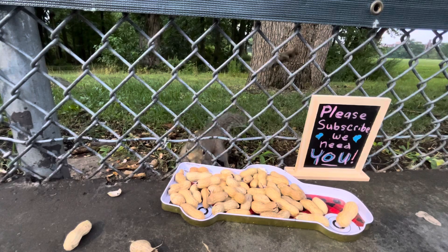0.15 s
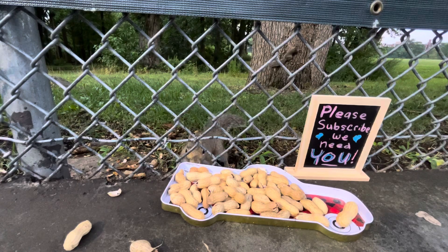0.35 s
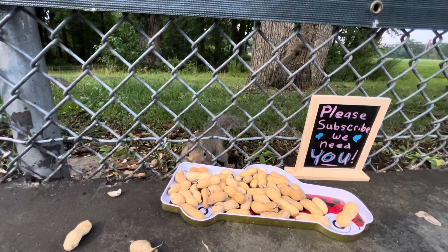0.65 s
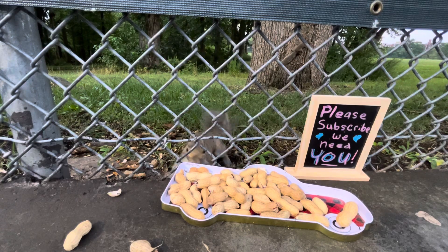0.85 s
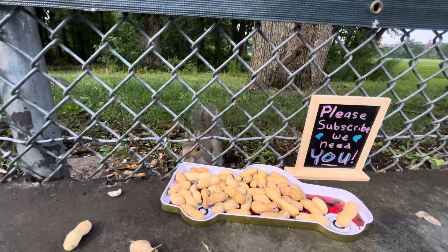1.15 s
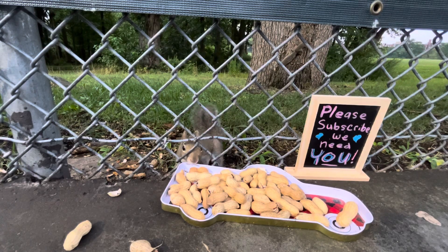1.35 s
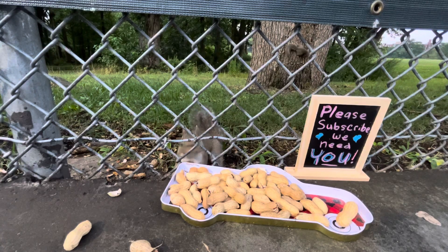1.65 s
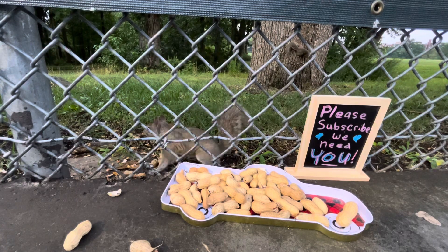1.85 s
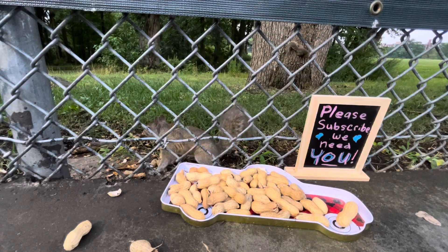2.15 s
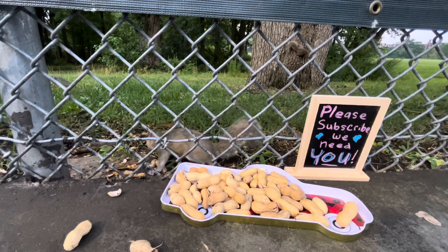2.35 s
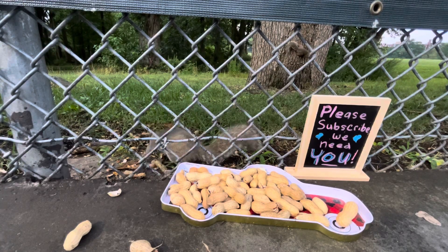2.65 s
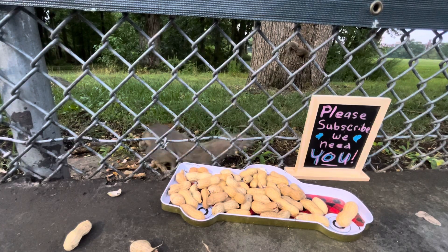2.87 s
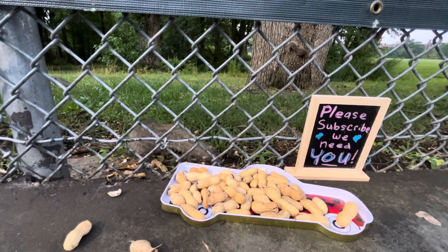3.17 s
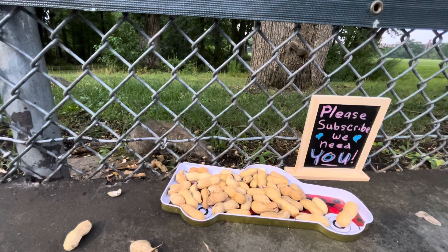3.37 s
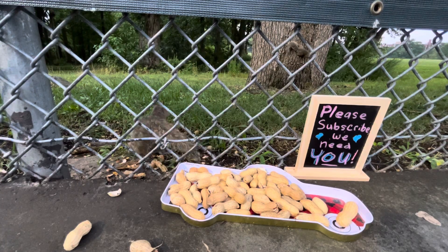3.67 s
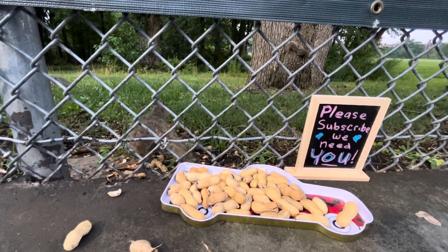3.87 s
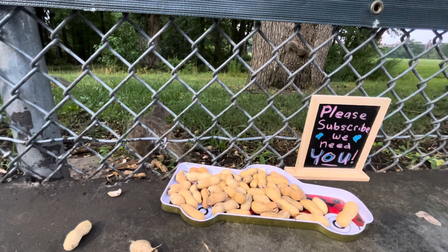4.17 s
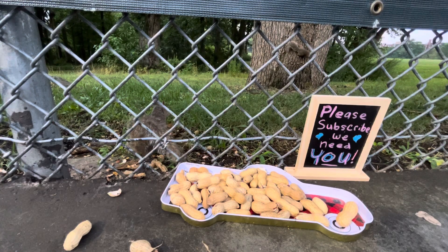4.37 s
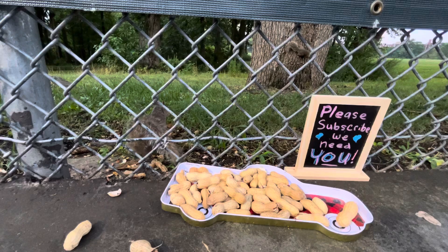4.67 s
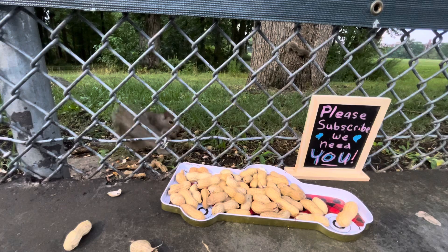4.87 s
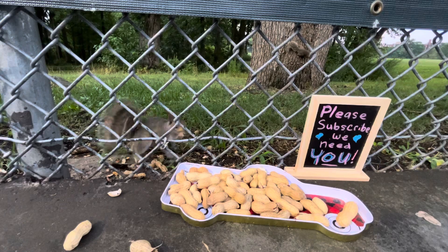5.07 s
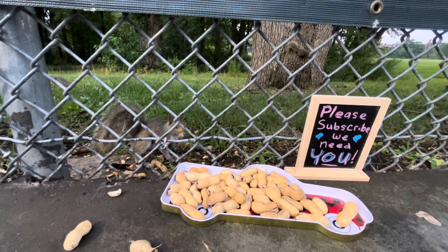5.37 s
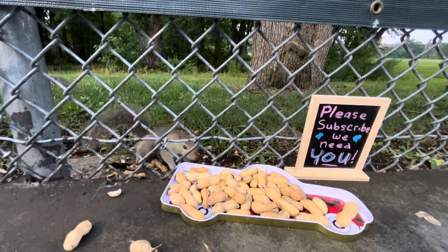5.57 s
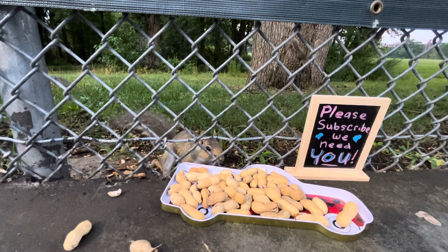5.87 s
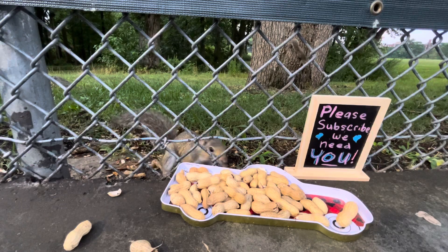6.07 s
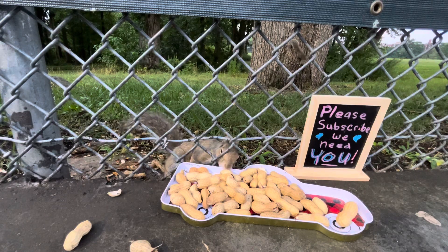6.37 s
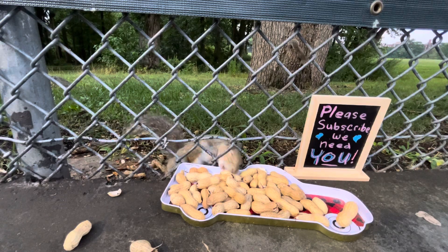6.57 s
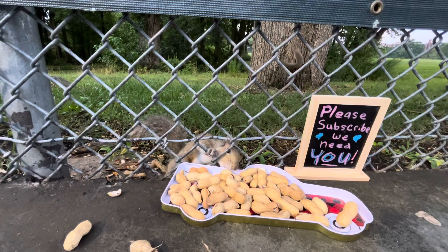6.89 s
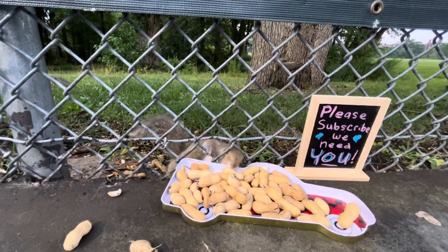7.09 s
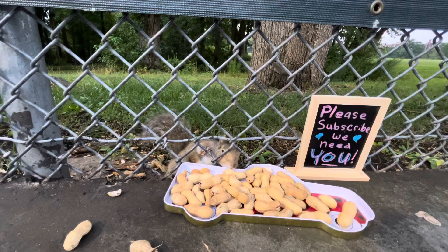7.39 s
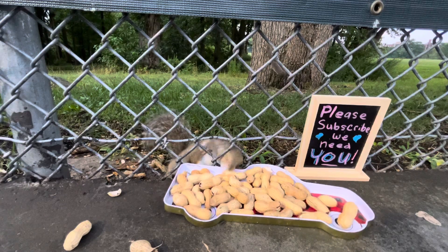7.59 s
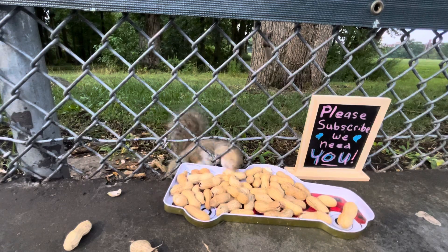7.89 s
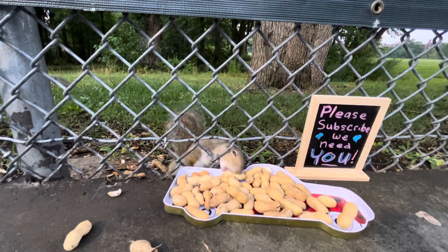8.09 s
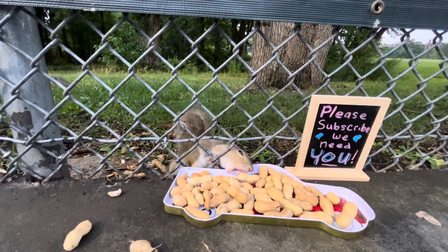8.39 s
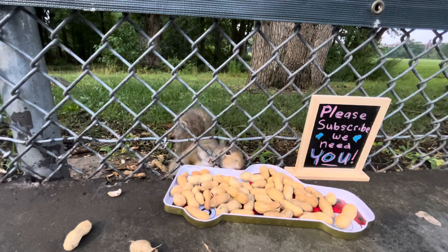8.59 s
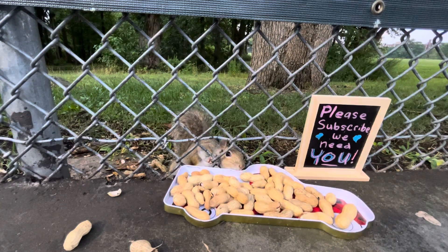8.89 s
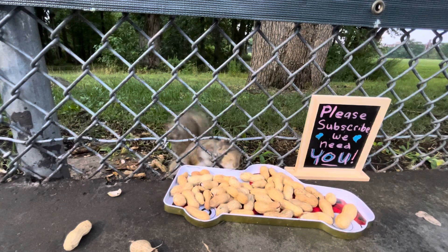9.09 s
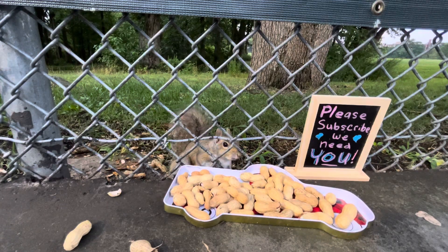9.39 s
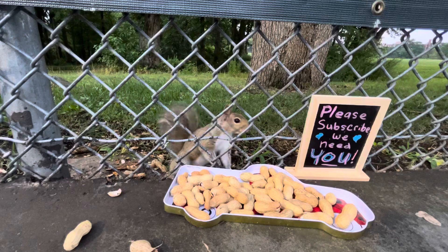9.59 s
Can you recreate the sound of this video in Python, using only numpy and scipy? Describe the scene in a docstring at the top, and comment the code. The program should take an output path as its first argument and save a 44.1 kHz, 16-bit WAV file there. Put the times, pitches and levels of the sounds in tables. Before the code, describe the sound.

Hollow racket, wall and ground pocks echo outdoors over a low hum; midway, peanuts clatter sharply in a tin tray beside faint claw ticks.

```python
"""A squirrel rummages in a tin tray of peanuts: grainy noise crackles as shells, fading tones ring as the tin.
Its claws and teeth tick on dry shells (tiny snaps of noise), and its paws rustle the husks.
Farther off a ball goes round a practice court: racket, wall, ground, each a click and a hollow ringing pock.
Crickets, distant traffic and town rumble are coloured noise; an engine hums as one wavering low tone."""
import sys
import numpy as np
from scipy import signal
from scipy.fft import rfft, irfft, next_fast_len
from scipy.io import wavfile
from scipy.ndimage import map_coordinates

SR = 44100
rng = np.random.default_rng(int(sys.argv[2]) if len(sys.argv) > 2 else 0)


def store_pcm(level_fs):
    """Save levels as 16-bit WAV."""
    pcm = np.round(np.clip(level_fs, -1, 1) * 32767).astype(np.int16)
    wavfile.write(sys.argv[1], SR, np.atleast_2d(pcm).T)


N = 429534


def amp(db):
    """Turns decibels into a plain multiplier."""
    return 10 ** (np.asarray(db) / 20)


def unit(x):
    """Scales x to an rms of 1."""
    return x / np.sqrt(np.mean(x ** 2) + 1e-20)


def fade(t, t60):
    """A natural decay: falls 60 dB in t60 seconds."""
    return np.exp(-np.log(1000) * t / t60)


def along(points, hz):
    """Reads a curve of (Hz, value) points on a log frequency axis."""
    f, v = np.transpose(points)
    return np.interp(np.log(hz + 1), np.log(f + 1), v)


def curves(rows):
    """One value per sample for each column after the time."""
    s, *cols = np.transpose(rows)
    return [np.interp(np.arange(N) / SR, s, c) for c in cols]


def wobble(rate):
    """A smooth curve through random points, `rate` of them a second."""
    points = rng.standard_normal(int(N * rate / SR) + 4)
    return map_coordinates(points, [np.arange(N) * rate / SR])


def filtered(x, response):
    """Multiplies the spectrum of x by a function of frequency."""
    n = x.shape[-1]
    m = next_fast_len(n + 4096)
    return irfft(rfft(x, m) * response(np.fft.rfftfreq(m, 1 / SR)), m)[..., :n]


def coloured(x, spectrum, size=1024):
    """Shapes the tone of x with a filter of unit energy that never sounds ahead of x."""
    # folding the cepstrum forward in time gives the filter its sharp start
    cep = irfft(np.log(amp(along(spectrum, np.fft.rfftfreq(size, 1 / SR)))))
    cep[1:size // 2] *= 2
    cep[size // 2 + 1:] = 0
    h = irfft(np.exp(rfft(cep)))
    return signal.fftconvolve(x, h[None] / np.linalg.norm(h), axes=1)[:, :x.shape[1]]


def add(out, s, x):
    """Mixes x into out from time s on."""
    i = max(round(s * SR), 0)
    out[:, i:i + x.shape[-1]] += x[..., :max(N - i, 0)]


def crackle(n, spread_db, shared=0.56, size=40):
    """Stereo noise broken into grains of `size` samples and very different strength; rms 1."""
    grains = np.repeat(amp(spread_db * rng.standard_normal(n // size + 1)), size)[:n]
    own = rng.standard_normal((2, n))
    common = rng.standard_normal(n)
    return unit(grains * (own + shared * common))


def ringing(t, hz, db, t60):
    """Fading tones, their strengths scaled together and met differently by each ear."""
    hz, db, t60 = hz[:, None, None], db[:, None, None], t60[:, None, None]
    strength = amp(db + 2 * rng.standard_normal((len(hz), 2, 1))) / np.linalg.norm(amp(db))
    cycles = hz * t + rng.random((len(hz), 2, 1))
    return np.sum(strength * np.sin(2 * np.pi * cycles) * fade(t, t60), axis=0)


# how alike left and right are at each pitch: pitch_hz, likeness (1 = the same, 0 = unrelated)
LIKENESS = [(60, 0.93), (130, 0.96), (290, 0.51), (640, 0.07), (1410, 0.33), (3100, -0.084), (6820, -0.052),
            (15000, -0.28)]


def rush(spectrum):
    """Stereo noise of rms 1, more alike at the two ears in the bass."""
    def mid_and_side(hz):
        turn = np.arccos(np.clip(along(LIKENESS, hz), -1, 1)) / 2
        return amp(along(spectrum, hz)) * [np.cos(turn), np.sin(turn)]

    mid, side = filtered(rng.standard_normal((2, N)), mid_and_side)
    return unit(np.array([mid + side, mid - side]))


# how fast the court's echo tail dies at each pitch: pitch_hz, t60_s
COURT_DECAY = [(200, 0.2), (550, 0.91), (850, 0.97), (1300, 0.37), (2500, 0.73), (6000, 0.36),
               (14000, 0.41)]


def court(x):
    """A diffuse outdoor tail builds up, then dies at a different speed for each pitch."""
    hz, t, z = signal.stft(rng.standard_normal((2, SR // 2)), SR, nperseg=256)
    build_up = 1 - np.exp(-t / 0.016)
    decay = fade(t, along(COURT_DECAY, hz)[:, None])
    tail = signal.istft(z * decay * build_up, SR, nperseg=256)[1]
    tail = tail + 0.1 * tail[::-1]  # each side leaks a little into the other
    return signal.fftconvolve(x, tail / np.linalg.norm(tail[0]), axes=1)


# tone colours of the town rumble, far tyres, crickets and hiss: pitch_hz, level_db (per Hz)
RUMBLE_COLOUR = [(20, -37), (35, -9.5), (48, -0.5), (80, 1), (120, 0), (180, -6.5), (280, -13.5),
                 (450, -22.5), (900, -54.5), (2000, -72)]
TRAFFIC_COLOUR = [(150, 4.5), (350, -1), (600, 1.5), (1000, 5.5), (1500, -4.5), (2200, -13), (4000, -21.5),
                  (6500, -37), (8000, -39), (15000, -71.5)]
CRICKET_COLOUR = [(3000, -32.5), (4500, -16.5), (5100, -4), (5500, 1.5), (5900, -8), (6400, -11),
                  (7000, -34), (9000, -72)]
HISS_COLOUR = [(2000, 14.5), (6500, 3.5), (8000, -8), (10500, -0.5), (12000, -16.5), (14500, -15),
               (16000, -39)]
# distant traffic draws away: time_s, level_db (before a 2 dB lift and a slow waver)
TRAFFIC_LEVEL = [(0.0, -47.5), (0.65, -47.5), (1.03, -45.5), (3.1, -45.5), (3.9, -48.5), (5.6, -53),
                 (8.3, -54), (9.0, -58), (9.74, -56.5)]
# strength of the engine's hum: time_s, level_db (peak, before it wavers)
HUM_LEVEL = [(0.0, -43), (1.2, -37), (2.75, -44), (3.1, -38), (4.6, -41), (5.4, -38), (6.15, -46),
             (6.35, -37), (7.6, -41), (8.55, -42), (9.05, -33.5), (9.74, -38)]
HUM_HZ = 65.26  # centre of its wavering pitch
RUMBLE_DB, CRICKET_DB, HISS_DB = -39.5, -60.5, -64  # rms, before they waver


def background():
    """Rumble, tyres, cricket chorus and hiss are coloured noise; the engine is a low sine tone."""
    traffic_db, = curves(TRAFFIC_LEVEL)
    hum_db, = curves(HUM_LEVEL)
    # the hum wavers in pitch and strength
    hum_hz = HUM_HZ + 3 * wobble(14)
    hum = amp(hum_db + 2.74 * wobble(14)) * np.sin(2 * np.pi * np.cumsum(hum_hz) / SR)
    rumble = amp(RUMBLE_DB + 1.07 * wobble(7)) * rush(RUMBLE_COLOUR)
    traffic = amp(traffic_db + 2.0 + 0.37 * wobble(3.94)) * rush(TRAFFIC_COLOUR)
    crickets = amp(CRICKET_DB + 0.82 * wobble(25)) * rush(CRICKET_COLOUR)
    crickets *= amp([[.5], [-.5]])  # slightly louder on the left
    hiss = amp(HISS_DB + 3.6 * wobble(7.5)) * rush(HISS_COLOUR)
    return hum + rumble + traffic + crickets + hiss


RATTLE_PER_S, RATTLE_T60 = 1200, 0.0097  # shell contacts a second; ring of each (s)
RATTLE_LOW_HZ, RATTLE_HIGH_HZ = 790, 7020  # pitch range of the shells


def rattle(count=14000):
    """Hollow shells catch on each other at random, each with its own pitch and strength; rms 1."""
    t = np.arange(SR // 140) / SR
    wait, pitch, phase, size = rng.random((count, 4)).T
    contact_s = np.cumsum(-np.log(1 - wait)) / RATTLE_PER_S
    at = (contact_s * SR).astype(int)[:, None] + np.arange(len(t))
    # the square root favours the higher pitches
    hz = RATTLE_LOW_HZ * (RATTLE_HIGH_HZ / RATTLE_LOW_HZ) ** np.sqrt(pitch[:, None])
    rings = amp(-16 * size[:, None]) * fade(t, RATTLE_T60)
    # the right ear meets each ring at a random phase
    ears = [rings * np.sin(2 * np.pi * (hz * t + side * phase[:, None])) for side in (0, 1)]
    return unit(np.array([np.bincount(at.ravel(), ear.ravel(), N)[:N] for ear in ears]))


# tone colours of shells, brittle husks and the woody pile: pitch_hz, level_db (per Hz)
SHELL_COLOUR = [(88, -44.5), (150, 0.5), (391, 1), (612, -6.5), (905, 1), (1170, -8.5), (1630, 4),
                (3490, -7.5), (4320, -4.5), (5360, -9), (6770, -7.5), (8230, -24), (13200, -19),
                (16000, -43)]
HUSK_COLOUR = [(3000, -17.5), (6000, -2.5), (9000, -6.5), (12000, -1.5), (14200, -5.5), (15000, -0.5),
               (16000, -26)]
PILE_COLOUR = [(90, -27), (200, -1.5), (450, -7.5), (800, 1), (1400, -5.5), (2300, -6.5), (3200, -4),
               (6000, -43)]
# shells dragged until they slip: start_s, end_s, final_db, swell_db (final is before the grit's own level)
SCRAPES = [(7.069, 7.076, -41, 2), (7.325, 7.343, -32, 6), (8.03, 8.1, -57, 0), (8.255, 8.334, -36, 12)]
# bouts of pawing in dry husks: start_s, length_s, level_db (before a 7 dB lift and a waver)
PAWING = [(0.0, 0.071, -83), (1.766, .12, -83), (2.918, 0.1, -86), (4.72, .3, -81), (5.5, 0.28, -94),
          (6.497, 0.22, -77.5), (6.974, .38, -73), (7.68, .15, -72.5), (8.02, .2, -74), (8.24, 0.086, -63)]
PAW_ATTACK_S, PAW_RELEASE_T60 = 0.043, 0.39  # rise and fall of a bout (s)
PAW_IDLE_DB = -89.5  # the stir between bouts, before the same lift
SETTLE_DB, SETTLE_T60 = -31, 0.22  # shells settle after each knock: level relative to it, decay (s)


def rummage():
    """Shells scrape and settle as the squirrel noses through the pile; husks rustle under its paws."""
    t = np.arange(SR) / SR
    rubbing, pawing = np.zeros((1, N)), np.full((1, N), amp(PAW_IDLE_DB))
    for s, db, *_ in KNOCKS:
        add(rubbing, s, amp(db + SETTLE_DB) * fade(t, SETTLE_T60))
    for start, end, db, swell_db in SCRAPES:
        length = max(round((end - start) * SR), 1)
        add(rubbing, start, amp(db + np.linspace(-swell_db, 0, length)))
    for start, length, db in PAWING:
        attack = np.minimum(t / PAW_ATTACK_S, 1)
        release = fade(np.maximum(t - length, 0), PAW_RELEASE_T60)
        add(pawing, start, amp(db) * attack * release)
    grit = amp(-4.0) * coloured(crackle(N, spread_db=1.5, size=32), SHELL_COLOUR)
    grit += amp(-6) * coloured(crackle(N, spread_db=4.5), PILE_COLOUR)
    grit += amp(-3.5) * rattle()
    shells = rubbing * amp(1.4 * wobble(70)) * grit
    rustle = coloured(crackle(N, spread_db=4.5), HUSK_COLOUR)
    husks = pawing * amp(7.0 + 2.5 * wobble(25)) * rustle
    return shells + husks


# claws and teeth on dry shells: time_s, strength_db (sets both parts of the tick)
TICKS = [(0.1347, -46.5), (0.4393, -45), (1.807, -56), (4.011, -40.5), (4.6882, -41.5), (4.7316, -44),
         (4.7703, -34), (5.5368, -53), (6.773, -47), (7.142, -38), (7.1844, -47), (7.672, -47)]
TICK_BODY_DB, TICK_BODY_GROWS = -48, .15  # dull part of a 0 dB tick; its dB per dB of strength
FAINT_TICKS_PER_S, FAINT_TICK_DB, FAINT_SPREAD_DB = 1.2, -57, 5  # small ticks: rate, strength, spread


def ticks(count=40):
    """Tiny dry snaps, each with a short crumble; the harder, the brighter. Faint ones fall at random."""
    out, t = np.zeros((2, N)), np.arange(SR // 10) / SR
    faint_s = np.cumsum(rng.exponential(1 / FAINT_TICKS_PER_S, count))
    faint_db = FAINT_TICK_DB + FAINT_SPREAD_DB * rng.standard_normal(count)
    snap = fade(t, 0.0098) + 0.15 * fade(t, 0.12)
    for s, db in TICKS + list(zip(faint_s, faint_db)):
        bright = coloured(crackle(len(t), spread_db=2) * snap, HUSK_COLOUR)
        body = coloured(crackle(len(t), spread_db=2) * snap, SHELL_COLOUR)
        tick = amp(db - 0.5) * bright + amp(TICK_BODY_DB + TICK_BODY_GROWS * db) * body
        add(out, s + 0.0012, tick)
    return out


# tone colour of the dull part of a contact, then of its click: pitch_hz, level_db (per Hz)
KNOCK_COLOUR = [(300, -11), (600, -10), (1050, 13.5), (1600, -29.5), (2500, -5.5), (5000, -20.5)]
CLICK_COLOUR = [(800, -31.5), (1500, 8.5), (3200, -1), (5500, 4), (7500, -3), (10000, -12), (15000, -58)]
RING_T60 = .052  # main ring of one pock (s)


def ball(rows, modes, slap_db, pock_db, click_db, knock_db, right_db, lag_ms, echo_s, flutter_db, wet_db,
         count=8):
    """Each contact is a click and a hollow pock that sinks to its pitch; the court answers."""
    out, t = np.zeros((2, N)), np.arange(SR // 3) / SR
    ears = np.maximum(t - np.array([[lag_ms / 1000], [0]]), 0)  # the left ear hears it later
    for s, snap_db, db, hz, echo_db in rows:
        cycles = hz * (ears + 0.00066 * (1 - np.exp(-ears / 0.00087)))
        # a near reflection swells the ring a few cycles later
        late = np.maximum(ears - .0052, 0)
        swell = amp(slap_db) * fade(late, .02) * (1 - np.exp(-late / .0015))
        linger = amp(-25.5) * fade(ears, 0.24)  # the air in the ball sings on faintly
        pock = np.sin(2 * np.pi * cycles) * (fade(ears, RING_T60) + swell + linger)
        for ratio, mode_db, t60 in modes:
            mode_hz = ratio * hz * (1 + 0.019 * rng.standard_normal())
            strength = amp(mode_db + 2 * rng.standard_normal())
            tone = np.sin(2 * np.pi * (mode_hz * ears + rng.random()))
            onset = 1 - np.exp(-2 * mode_hz * ears)
            pock += strength * tone * fade(ears, t60) * onset
        knock = coloured(rng.standard_normal((1, len(t))) * fade(t, 0.048), KNOCK_COLOUR)
        snap = fade(t, 0.00084) + 0.11 * fade(t, 0.021)
        click = coloured(rng.standard_normal((2, len(t))) * snap, CLICK_COLOUR)
        click *= amp(snap_db + click_db) / np.linalg.norm(click, axis=1, keepdims=True)
        click *= amp([[0], [-9]])  # weaker on the right
        tilted_pock = pock * amp([[-right_db], [right_db]])
        body = amp(db + pock_db) * (tilted_pock + amp(knock_db) * knock)
        start = s + .001
        add(out, start, click + body)
        add(out, start + echo_s, amp(echo_db) * (body + amp(-5) * click))
        # the pock keeps fluttering between two hard faces, weaker on each trip
        for trip in range(1, count):
            trip_s = (trip + 1) * echo_s + rng.normal(0, 0.0011)
            add(out, start + trip_s, amp(echo_db + trip * min(flutter_db, -2)) * body)
        add(out, start, amp(wet_db) * court(body + amp(2.0) * click))
    return out


# The levels in the next three tables are before the click and pock gains given in rally().
# ball on the ground: time_s, pock_db, pitch_hz
BOUNCES = [(0.233, -29, 834), (1.885, -34, 880), (3.6711, -35.5, 882), (5.3654, -33.5, 869),
           (7.0667, -29.5, 913), (8.737, -31.5, 919)]
# racket strokes, two quick contacts each: time_s, gap_s, click_db, first_pock_db, second_pock_db
STROKES = [(0.887, 0.012, -27, -28.5, -23.5), (2.598, 0.017, -30, -32, -28.5),
           (4.3211, .0139, -27, -31.5, -23.5), (6.0305, 0.012, -27.5, -32, -25.5),
           (7.711, .0112, -28, -24, -25.5), (9.406, .011, -26.5, -29, -25)]
# ball on the wall: time_s, pock_db, echo_db (relative to the pock)
WALL = [(1.5027, -29.5, -14), (3.2196, -27, -19.5), (4.8755, -29.5, -10.5), (6.722, -27.5, -22),
        (8.1608, -30.5, -19)]
# what rings beside the pock, for racket and for bare ball: pitch_ratio (times its pitch), level_db, t60_s
RACKET_MODES = [(0.172, -3, 0.057), (.295, 5.5, 0.029), (0.378, -2, 0.034), (1.12, -5.5, 0.12),
                (1.29, -12, 0.11), (1.6, -16, 0.042), (2.13, -18.5, 0.065)]
BALL_MODES = [(0.241, 1, 0.031), (.35, -14, 0.044), (0.673, -11, 0.087), (1.15, -12.5, 0.04),
              (1.4, -34, 0.019), (1.77, -19.5, 0.073), (2.66, -35, 0.038)]
# tone colour of a gritty ground contact: pitch_hz, level_db
GROUND_COLOUR = [(1150, -0.5), (1900, -15), (3300, -6), (4900, 0), (6200, -5), (7500, -14.5), (15000, -12)]
STROKE_HZ, WALL_HZ = 819, 909  # pitch the pock sinks to
FIRST_ECHO_DB, SECOND_ECHO_DB, BOUNCE_ECHO_DB = -2, -7, -15.5  # echo relative to its contact
WALL_CLICK_DB, BOUNCE_CLICK_DB = 4, -2.5  # click relative to the pock, before the same gains
SLAP_DB, FAINT_SLAP_DB = 9, 2  # strength of the near reflection


def rally():
    """Stroke, wall and bounce come from different places on the court."""
    on_ground = [(s, db + BOUNCE_CLICK_DB, db, hz, BOUNCE_ECHO_DB) for s, db, hz in BOUNCES]
    first = [(s, click_db, db, STROKE_HZ, FIRST_ECHO_DB) for s, gap, click_db, db, _ in STROKES]
    second = [(s + gap, click_db, db, STROKE_HZ, SECOND_ECHO_DB) for s, gap, click_db, _, db in STROKES]
    on_wall = [(s, db + WALL_CLICK_DB, db, WALL_HZ, echo_db) for s, db, echo_db in WALL]
    bounces = ball(on_ground, BALL_MODES, FAINT_SLAP_DB, pock_db=2.5, click_db=24.5, knock_db=-2,
                   right_db=-2.5, lag_ms=0.014, echo_s=0.037, flutter_db=-23.0, wet_db=-16)
    strokes = ball(first + second, RACKET_MODES, SLAP_DB, pock_db=3.0, click_db=20, knock_db=-16.5,
                   right_db=1.5, lag_ms=0.15, echo_s=.0372, flutter_db=-7.5, wet_db=-12.5)
    wall = ball(on_wall, BALL_MODES, FAINT_SLAP_DB, pock_db=6.5, click_db=14, knock_db=-16,
                right_db=1, lag_ms=0.013, echo_s=0.034, flutter_db=-4, wet_db=-10.5)
    gritty_bounces = filtered(bounces, lambda hz: amp(along(GROUND_COLOUR, hz)))
    return gritty_bounces + strokes + wall


def stroke_tails(below_click_db=-38.5, t60=0.76):
    """A faint bright hiss of fading noise trails each racket stroke."""
    out, t = np.zeros((2, N)), np.arange(SR // 2) / SR
    for s, _, click_db, *_ in STROKES:
        hiss = coloured(rng.standard_normal((2, len(t))), HUSK_COLOUR)
        add(out, s, amp(click_db + below_click_db) * fade(t, t60) * hiss)
    return out


# peanuts knocking in the tray: time_s, strength_db (of the whole hit), treble_db (husks in it), t60_s
KNOCKS = [(6.978, -35, -8, 0.082), (7.031, -38, 0, .07), (7.0748, -12, -10, 0.11), (7.1033, -25, -15, 0.15),
          (7.245, -6.5, -6, .06), (7.2694, -17.5, -26, 0.13), (7.3158, -21, -24, .13),
          (7.342, -19.5, -32, 0.097), (7.3902, -27, -31, 0.085), (7.5829, -27, -10, 0.13),
          (7.608, -33, -3, 0.11), (7.9834, -38.5, -3, .2), (8.0168, -28.5, -28, 0.18),
          (8.054, -40, -20, .1), (8.092, -38, -22, 0.13), (8.218, -27, -25, 0.17), (8.2551, -35, -3, 0.37),
          (8.3374, -15.5, -17, 0.066), (8.4347, -32, -14, 0.22), (8.469, -27, -32, 0.086)]
# tones of the tin tray: pitch_hz, width_hz (wider dies sooner, within limits), level_db
TRAY = [(1603, 45, 1), (2740, 15, 0), (3370, 150, -14), (3520, 7.8, -20), (3850, 27, -7.5), (4335, 68, 7.5),
        (4748, 60, 4.5), (5050, 73, 9), (5720, 38, -4), (6160, 53, -14)]
PILE_DB, PILE_T60 = -16, 0.095  # the pile's share of each knock; its decay (s)


def tray(count=16):
    """Peanuts jostle in a burst of crackle; their hollow shells, the pile and the tin beneath them ring."""
    out, t = np.zeros((2, N)), np.arange(SR // 4) / SR
    tin_hz, width_hz, tin_db = np.transpose(TRAY)
    tin_t60 = np.clip(np.log(1000) / np.pi / width_hz, .05, .11)
    rise = 1 - np.exp(-t / 0.0018)
    for s, db, treble_db, t60 in KNOCKS:
        crumble = fade(t, max(t60, .01))
        blow = rise * (crumble + 0.48 * fade(t, 0.011))
        shells = coloured(crackle(len(t), spread_db=1.5) * blow, SHELL_COLOUR)
        shifting = crackle(len(t), spread_db=2, shared=0.51) * rise * fade(t, PILE_T60)
        pile = coloured(shifting, PILE_COLOUR)
        splinters = crackle(len(t), spread_db=3, shared=1.5)
        husks = coloured(splinters * rise * (fade(t, 0.024) + 0.24 * crumble), HUSK_COLOUR)
        husks *= amp([[-1], [1]])  # slightly louder on the right
        tin = ringing(t, tin_hz, tin_db, tin_t60)
        # every shell has its own size, so its own pitch
        hollow = ringing(t, rng.uniform(1200, 7200, count), np.zeros(count), np.full(count, .05))
        noise = amp(-11.0) * shells + amp(PILE_DB) * pile + amp(treble_db - 4.5) * husks
        tones = rise * (amp(-8.5) * tin + amp(-6) * hollow)
        hit = amp(db) * (noise + tones)
        add(out, s, hit)
        add(out, s, amp(-20.5) * court(hit))
    return out


def scene():
    """All the sounds together, in the order they first appear."""
    return background() + rummage() + ticks() + rally() + stroke_tails() + tray()


# gentle overall tone: pitch_hz, level_db
OVERALL_TONE = [(20, -9.5), (40, 0.5), (14000, -0.5), (16000, -19)]
TOP_HZ = 16300  # nothing is kept from here up


def record(dry):
    """Softens the deepest bass and the highest treble and keeps nothing above the band limit."""
    return filtered(dry, lambda hz: amp(along(OVERALL_TONE, hz)) * (hz < TOP_HZ))


dry = scene()
out = record(dry)
store_pcm(out)
```